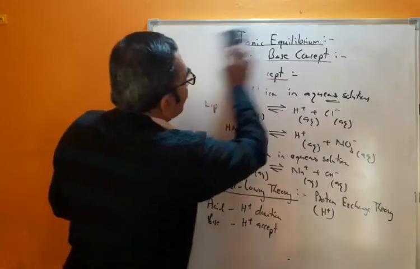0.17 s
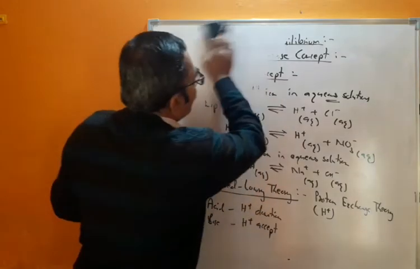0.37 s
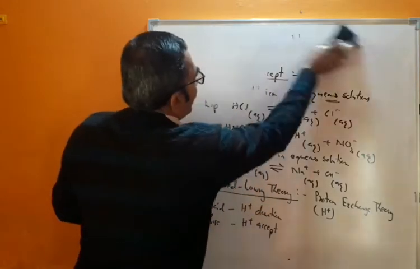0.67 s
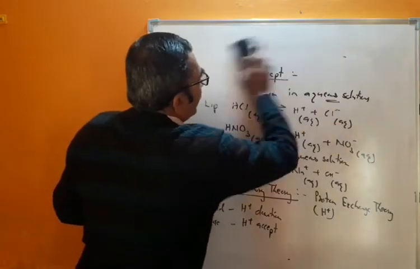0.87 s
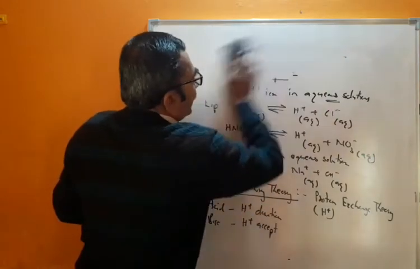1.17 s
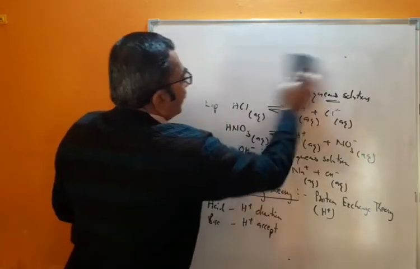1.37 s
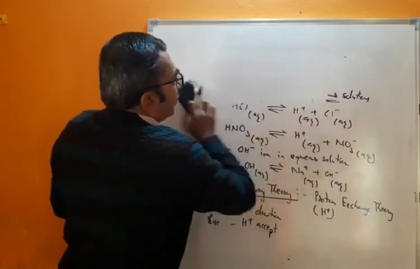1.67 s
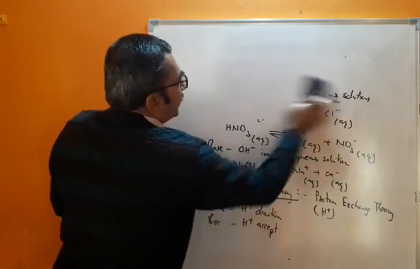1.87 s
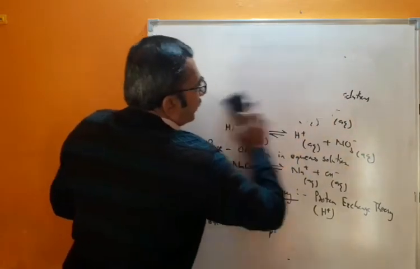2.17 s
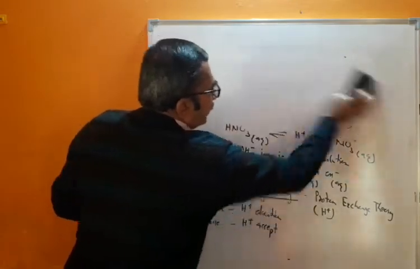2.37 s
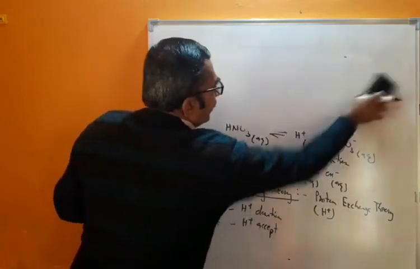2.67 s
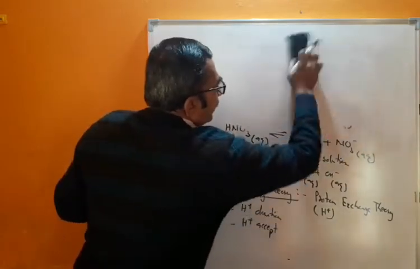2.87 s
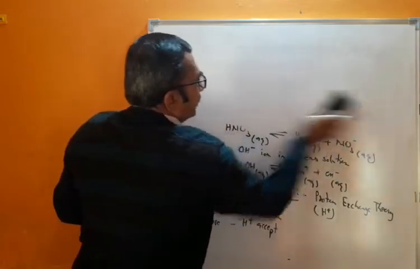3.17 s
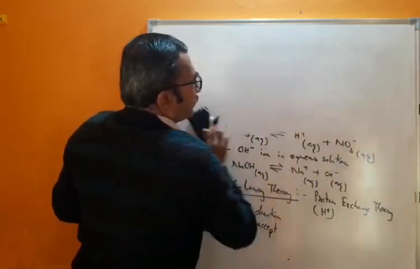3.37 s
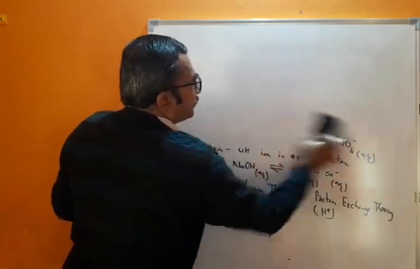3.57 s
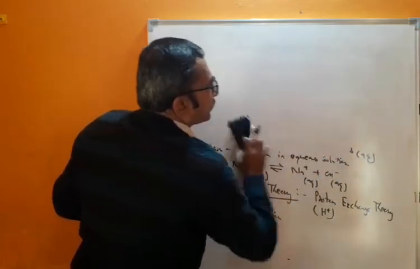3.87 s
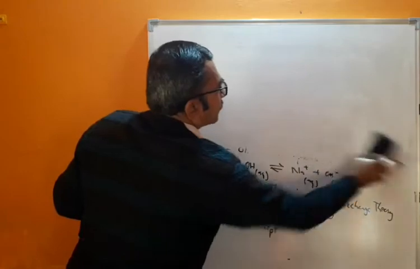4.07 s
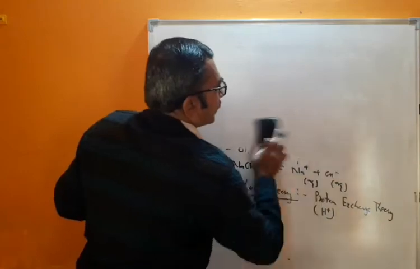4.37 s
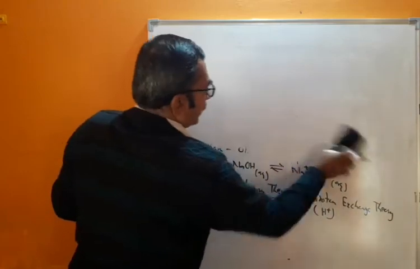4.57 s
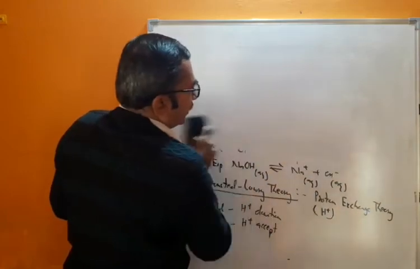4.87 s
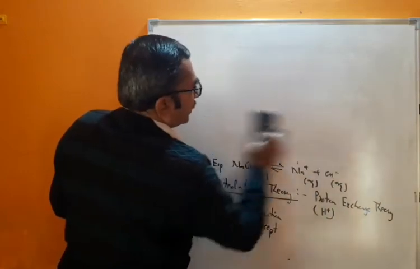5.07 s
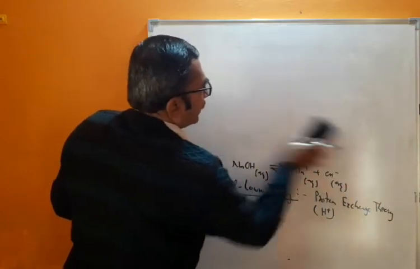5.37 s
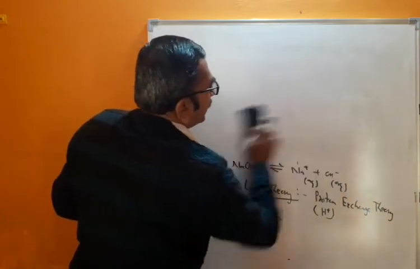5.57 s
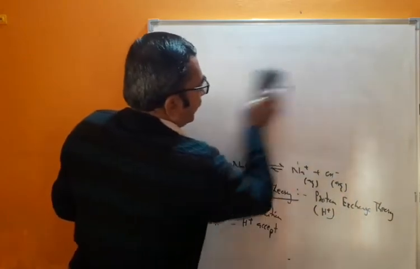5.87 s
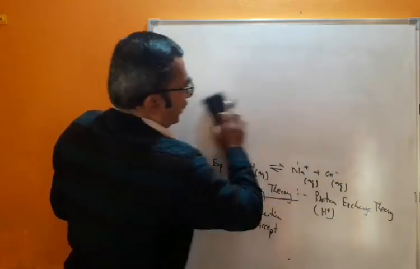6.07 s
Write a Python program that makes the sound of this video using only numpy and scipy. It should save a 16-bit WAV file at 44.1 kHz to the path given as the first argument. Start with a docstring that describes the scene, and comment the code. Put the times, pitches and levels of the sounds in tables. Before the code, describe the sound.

A felt duster rubs across a whiteboard in quick, uneven back-and-forth strokes, each a soft hiss with dull drumming from the board beneath. The pad squeaks once early on, and about halfway through the board rattles against the wall with a short room echo. Low street rumble, a hum and a faint whine come from outside, with a brief high insect chirr and, near the end, a lightly revving engine.

```python
"""Quick back-and-forth swishes: a felt duster wipes a whiteboard in a hard-walled room.
Felt fibres hiss on the slick face, swelling with each stroke, while the pad's drag drums the board.
The pad squeaks once; later the board rattles against the wall, rings and echoes in the room.
From outside come street rumble, a low hum and a faint whine, one high insect chirr
and, in the last two seconds, an engine that revs a little."""
import sys
import numpy as np
from scipy import signal
from scipy.fft import rfft, irfft, next_fast_len
from scipy.io import wavfile
from scipy.ndimage import uniform_filter1d

SR = 44100
rng = np.random.default_rng(int(sys.argv[2]) if len(sys.argv) > 2 else 0)


def inscribe(sig):
    """Save sig as 16-bit PCM at rate SR to the path in sys.argv[1].

    A 1-D sig is mono; a 2-D sig holds one channel per row.
    Samples are clipped to [-1, 1] before scaling.
    """
    pcm = np.round(np.clip(np.atleast_2d(sig).T, -1, 1) * 32767)
    wavfile.write(sys.argv[1], SR, pcm.astype(np.int16))


N = 274302

# wipes, each lasting until the next: (start [s], peak [dB], level at the opening turn [dB],
# scuff EQ [dB], upper hiss EQ [dB], top EQ [dB])
STROKES = [(0.0, -53.7, -55.5, 1.8, -0.2, 1), (0.125, -50.0, -58.5, -1.2, -1.1, -1),
           (0.289, -51, -54, 2, -1, -1), (0.439, -47, -57.5, 1.5, -0.5, -2.8),
           (0.688, -49.5, -53.9, 2.7, -0.4, 0.1), (0.873, -47.5, -54, 0.5, -0.6, -2),
           (1.058, -48, -53, 1.5, -1.5, -1), (1.272, -47, -53, -0.5, -0.5, -1.5),
           (1.497, -48.4, -54.3, 0.2, -0.0, 0.5), (1.716, -46.5, -55, 1.5, -0.8, -2),
           (1.99, -50, -54.2, 0, 0.0, 2.3), (2.175, -47.0, -55.5, -1.5, -1.5, -1),
           (2.415, -51, -54.1, 0, 0.5, 2.5), (2.554, -50, -57.5, -1.3, 1, 1.5),
           (2.744, -49.4, -53.5, 0.5, -1, -0.3), (2.918, -47.5, -56.5, -1.0, -0.3, -1.5),
           (3.143, -48, -53.5, 1.4, -1, 0.5), (3.422, -47.8, -55, 0.4, 0.4, 0),
           (3.712, -50.2, -57, -1.2, 1, 2), (3.906, -48, -56.5, -1.1, 1.8, 0.5),
           (4.2, -49.5, -57.5, -0.4, 0.5, 3), (4.44, -49.5, -56, 0.3, 1.5, -0.2),
           (4.664, -49.5, -56, -0.7, 1, 1.5), (4.959, -49, -58.5, -0.7, 1.5, 0.2),
           (5.329, -50.5, -59, 0.2, 1.5, 1), (5.547, -49, -56.5, -1, 0.4, 0.1),
           (5.797, -50.1, -56, -1, 0, 0.7), (6.086, -54.6, -58, -1, 1, 0.5)]
LAST_TURN_S, LAST_TURN_DB = 6.26, -70
# centres of the scuff, hiss, upper hiss and top EQ bands: (frequency [Hz])
EQ_HZ = [1700, 3500, 6200, 11500]
# colour of the felt's hiss: (frequency [Hz], relative level [dB])
FELT_COLOUR = [(530, -20.5), (900, -10), (1100, -5), (1490, -2.5), (2120, -3.5), (3300, -0.5), (4350, -1),
               (5580, -3.5), (7620, -8.5), (8790, -9), (10100, -7.5), (11200, -10), (13000, -12.5),
               (15600, -21.5)]
# resonances under the pad: (frequency [Hz], width [Hz], send [dB])
PAD_PEAKS = [(1715, 75, -14.5), (3307, 150, -23), (9970, 620, -10.5)]
# how far the hiss swells with a stroke: (frequency [Hz], depth [dB per dB])
SWELL_DEPTH = [(1300, 0.59), (2100, 0.75), (3000, 0.95), (4300, 1.17), (6200, 1.35), (10500, 1.58),
               (15000, 2)]
# colour of the board's drumming: (frequency [Hz], relative level [dB])
BOARD_COLOUR = [(200, -13), (330, -3.5), (500, 5), (700, 5), (950, 6), (1300, -19)]
# fader ride of the drumming: (time [s], level [dB])
DRUMMING_RIDE = [(0, -63), (.28, -59), (.4, -58.5), (.7, -61.5), (.88, -65), (1.05, -60), (1.4, -60),
                 (1.55, -66), (2.0, -70), (2.27, -64.5), (2.45, -66.5), (2.92, -68.5), (2.99, -52.5),
                 (3.15, -58.5), (3.35, -57.5), (3.7, -68.5), (4.04, -72), (4.15, -62), (4.42, -68),
                 (4.52, -61.5), (4.7, -69.5), (5.04, -70.5), (5.15, -61.5), (5.35, -66), (5.47, -59),
                 (5.8, -66), (6.22, -73)]
# board modes: (frequency [Hz], gain when knocked [dB], t60 [s])
BOARD_MODES = [(241, 1.5, 0.21), (339.6, -6.5, 0.39), (462.6, -5, 0.2), (546, -10.5, 0.45),
               (711, -12.5, 0.28), (845, -2, 0.11), (1105, -10, 0.18), (1194, -4, .1), (1268, 0, 0.18),
               (1514, -5.5, 0.07), (1760, -5, 0.039), (1966, -3, .05)]
# colour of the street rumble: (frequency [Hz], relative level [dB])
RUMBLE_COLOUR = [(15, -62), (25, -34), (69, -15), (79, -5.5), (97, -5), (113, 3.5), (130, -8.5), (151, 2),
                 (184, -5.5), (237, -2), (400, -11), (520, -16), (880, -120)]
# fader ride of the rumble: (time [s], level within 140-330 Hz [dB])
RUMBLE_RIDE = [(0, -67), (.25, -65), (.32, -59.5), (.8, -60), (.88, -65.5), (1.04, -59), (1.5, -64),
               (2.0, -62.5), (2.9, -64.5), (3.05, -59), (3.6, -65), (4.5, -60), (4.95, -63), (5.15, -55.5),
               (5.33, -61), (5.5, -55.5), (5.8, -63), (6.22, -62)]
# fader ride of the hum: (time [s], rms level [dB])
HUM_RIDE = [(0, -72), (.38, -78), (.44, -60), (.55, -85), (.62, -59), (.8, -58), (.93, -70), (1.02, -56.5),
            (1.35, -84), (1.58, -67), (1.85, -86), (2.13, -63), (2.21, -73), (2.3, -57.5), (2.9, -68),
            (3.06, -74), (3.22, -61.5), (3.45, -63.5), (4.14, -68), (4.4, -70)]
# fader ride of the whine: (time [s], rms level [dB])
WHINE_RIDE = [(0, -61), (.75, -61), (1.6, -63), (1.75, -71), (1.95, -59), (2.3, -62.5), (2.75, -63),
              (2.95, -66), (6.22, -72)]
# the pad's squeak: (time [s], pitch [Hz], rms level [dB])
SQUEAK = [(1.305, 1144, -62), (1.315, 1167, -51), (1.33, 1080, -54), (1.345, 990, -53), (1.365, 1017, -60)]
# the insect's chirr: (time [s], pitch [Hz], rms level [dB])
CHIRR = [(1.75, 11450, -82), (1.85, 11450, -69), (2.05, 11450, -70), (2.12, 11600, -60.5),
         (2.45, 11620, -60.5), (2.75, 11600, -60.5), (2.85, 11520, -62), (2.93, 11450, -78)]
# board against wall: (time [s], strength [dB], hardness [dB per octave])
KNOCKS = [(3.375, -46, 2.5), (3.385, -42.5, 2.5), (3.394, -47, -1.5), (3.409, -51.5, 6.5), (3.44, -55.5, 1)]
# engine speed: (time [s], firing rate [Hz])
ENGINE_REVS = [(4.25, 19.4), (4.66, 20.5), (5.0, 21.55), (5.25, 20.75), (5.55, 20.2), (6.22, 20.2)]
# fader rides of the engine: (time [s], fifth order rms [dB], sixth order rms [dB])
ENGINE_RIDE = [(4.25, -78, -72), (4.5, -55.5, -72), (4.7, -62.5, -70), (4.81, -60, -56.5),
               (4.97, -54.5, -63), (5.05, -61.5, -55), (5.3, -53.5, -67), (5.4, -59.5, -63),
               (5.53, -54, -59), (6.0, -57.5, -66), (6.22, -59, -54)]
# its weaker orders: (multiple of the firing rate, base level against the fifth [dB])
ENGINE_ORDERS = [(2, -22), (4, -16), (7, -10), (8, -17), (12, -15), (13, -13.5), (14, -16)]

TIME_S = np.arange(N) / SR
BIN_HZ = np.maximum(np.arange(N // 2 + 1) * SR / N, 10)


def amp(db):
    """Gain of a dB value."""
    return 10 ** (np.asarray(db) / 20)


def unit_rms(x):
    """Scaled to rms 1."""
    return x / np.sqrt(np.mean(x ** 2) + 1e-20)


def automation(rows):
    """A timed table's columns as curves, one value per sample."""
    times, *columns = np.transpose(rows)
    return [np.interp(TIME_S, times, column) for column in columns]


def gate(rows, fade_s=0.085):
    """Fades in from a table's first time and out from its last."""
    return np.clip(np.minimum(TIME_S - rows[0][0], rows[-1][0] + fade_s - TIME_S) / fade_s, 0, 1)


def at_hz(points, hz):
    """A curve read on a log frequency axis."""
    points_hz, values = np.transpose(points)
    return np.interp(np.log(hz), np.log(points_hz), values)


def drift(rate_hz):
    """A slow random wander of rms 1."""
    hop = 40
    r = np.exp(-2 * np.pi * rate_hz * hop / SR)
    slow = signal.lfilter([1], [1, -2 * r, r * r], rng.standard_normal(N // hop + 2002))[2000:]
    return np.interp(np.arange(N) / hop, np.arange(len(slow)), unit_rms(slow))


def coloured(x, colour, low_hz=20, high_hz=20000):
    """x through an EQ curve, at rms 1 between the two frequencies."""
    bins = rfft(x) * amp(at_hz(colour, BIN_HZ))
    return irfft(bins, N) / np.std(irfft(bins * (BIN_HZ > low_hz) * (BIN_HZ < high_hz), N))


def resonance(x, hz, width_hz):
    """Two-pole peak, gain 1 on top."""
    r, w = np.exp(-np.pi * width_hz / SR), 2 * np.pi * hz / SR
    return signal.lfilter([1, 0, -1], [1, -2 * r * np.cos(w), r * r], x) * (1 - r * r) / 2


def ring(clicks, hz, t60):
    """A unit click sets a sine of height 1 ringing."""
    r, w = amp(-60 / (t60 * SR)), 2 * np.pi * hz / SR
    return signal.lfilter([0, np.sin(w)], [1, -2 * r * np.cos(w), r * r], clicks + 1e-18)


def tone(hz, level_db):
    """A sine of moving pitch and given rms level."""
    phase = 2 * np.pi * np.cumsum(hz) / SR + rng.uniform(0, 2 * np.pi)
    return np.sqrt(2) * amp(level_db) * np.sin(phase)


def strokes(turn_s=0.03):
    """The pad speeds up and slows between turns: the level arches, the EQ glides stroke to stroke."""
    start, peak_db, turn_db, scuff_db, upper_db, top_db = np.transpose(STROKES)
    turns = np.append(start, LAST_TURN_S)
    progress = np.interp(TIME_S, turns, np.arange(len(turns)))
    stroke = np.minimum(progress.astype(int), len(start) - 1)
    floor_db = np.interp(TIME_S, turns, np.append(turn_db, LAST_TURN_DB))
    level_db = floor_db + (peak_db[stroke] - floor_db) * np.abs(np.sin(np.pi * progress))
    middles = (turns[1:] + turns[:-1]) / 2
    eq_db = [np.interp(TIME_S, middles, db) for db in (scuff_db, np.zeros_like(start), upper_db, top_db)]
    return uniform_filter1d(level_db, int(turn_s * SR)), eq_db   # the wrist rounds off each turn


def felt_hiss(grain_db=2.0, flicker_db=0.51, lead_s_per_octave=0.0015):
    """Countless fibre slips; the treble swells earlier and further with pad speed than the low scuff."""
    level_db, eq_db = strokes()
    mean_db = level_db.mean()
    slips = rng.standard_normal(N) * amp(grain_db * rng.standard_normal(N))
    slips += sum(amp(db) * resonance(slips, hz, width_hz) for hz, width_hz, db in PAD_PEAKS)
    spectrum = rfft(coloured(slips, FELT_COLOUR, 2500, 4800))
    centres = np.geomspace(900, 15000, 10)
    hiss = np.zeros(N)
    for centre in centres:
        band = irfft(spectrum * np.interp(np.log(BIN_HZ), np.log(centres), centres == centre), N)
        eq_weights = [np.interp(np.log(centre), np.log(EQ_HZ), solo) for solo in np.eye(len(EQ_HZ))]
        lead_s = lead_s_per_octave * np.log2(centre / EQ_HZ[1])
        swell_db = at_hz(SWELL_DEPTH, centre) * np.interp(TIME_S + lead_s, TIME_S, level_db - mean_db)
        hiss += band * amp(swell_db + np.dot(eq_weights, eq_db) + flicker_db * drift(12))
    return amp(mean_db) * hiss


def board_drumming(ringing_db=-14.5, rattle_db=-50.5):
    """The pad's drag and the rattle shake the board: dull noise, part of it held in the board's modes."""
    shake = coloured(rng.standard_normal(N), BOARD_COLOUR)
    ringing = sum((-1) ** k * resonance(shake, hz, np.log(1000) / (np.pi * t60))
                  for k, (hz, _, t60) in enumerate(BOARD_MODES))
    drag = amp(automation(DRUMMING_RIDE)[0] + 2.6 * drift(3.3))
    return np.hypot(drag, shudder(rattle_db)) * unit_rms(shake + amp(ringing_db) * unit_rms(ringing))


def street_rumble(wander_db=2.0):
    """A bed of low traffic noise that heaves unevenly."""
    gain = amp(automation(RUMBLE_RIDE)[0] + wander_db * drift(5.0))
    return gain * coloured(rng.standard_normal(N), RUMBLE_COLOUR, 140, 330)


def hum(hz=101.9, waver_hz=1.0):
    """A low, slightly wavering sine that swells and sinks."""
    return tone(hz + waver_hz * drift(3.6), automation(HUM_RIDE)[0]) * gate(HUM_RIDE)


def whine(hz=1086, width_hz=65):
    """Noise narrowed to a faint pitch by two resonances in series."""
    narrow = resonance(rng.standard_normal(N), hz, width_hz)
    return amp(automation(WHINE_RIDE)[0]) * unit_rms(resonance(narrow, hz, 2 * width_hz))


def pad_squeak():
    """The pad squeaks once: a short sine that bends downward."""
    return tone(*automation(SQUEAK)) * gate(SQUEAK, fade_s=0.0074)


def insect(half_width_hz=77):
    """A high chirr: a narrow band of noise riding on a slowly moving pitch."""
    hz, level_db = automation(CHIRR)
    lowpass = signal.butter(3, half_width_hz, fs=SR, output="sos")
    flutter = signal.sosfilt(lowpass, rng.standard_normal((2, N)))
    phase = 2 * np.pi * np.cumsum(hz) / SR
    return amp(level_db) * unit_rms(flutter[0] * np.cos(phase) + flutter[1] * np.sin(phase))


def wall_rattle():
    """Each knock of board on wall strikes the board's modes; a harder knock favours the upper ones."""
    times, strength_db, hardness = np.transpose(KNOCKS)
    onsets = np.round(times * SR).astype(int)
    rattle = np.zeros(N)
    for k, (hz, mode_db, t60) in enumerate(BOARD_MODES):
        clicks = np.zeros(N)
        clicks[onsets] = amp(strength_db + mode_db + hardness * np.log2(hz / 600))
        rattle += (-1) ** k * ring(clicks, hz, t60)   # neighbours swing opposite ways, thinning the bass
    return rattle


def shudder(level_db, attack_s=0.011, t60=0.56):
    """Envelope of the shaken board: it jumps up with the first knock and dies away."""
    age_s = TIME_S - KNOCKS[0][0]
    return amp(level_db - 60 * np.abs(age_s) / t60) * np.clip(age_s / attack_s, 0, 1)


def board_thud(level_db=-47.5, band_hz=(150, 380)):
    """The weight under the rattle: a burst of low noise."""
    bandpass = signal.butter(3, band_hz, "band", fs=SR, output="sos")
    return shudder(level_db) * unit_rms(signal.sosfilt(bandpass, rng.standard_normal(N)))


def room_echo(x, t60=0.55, damping_hz=5000):
    """Sound bounces between hard walls: twelve feedback delays, duller on every round."""
    size = next_fast_len(N + SR)
    hz = np.arange(size // 2 + 1) * SR / size
    decay_s = t60 * (0.4 + 0.6 / (1 + (hz / damping_hz) ** 2))
    response = 0
    for k, delay_s in enumerate(rng.uniform(0.015, 0.045, 12)):
        bounce = amp(-60 * delay_s / decay_s) * np.exp(-2j * np.pi * hz * delay_s)
        response += (-1) ** k * bounce / (1 - bounce)
    return irfft(rfft(x, size) * response, size)[:N]


def engine(waver_db=1.6, nearing_db_per_s=4):
    """Orders of the firing rate: the weak ones waver, those below the fifth grow as the engine nears."""
    firing_hz = automation(ENGINE_REVS)[0]
    fifth_db, sixth_db = automation(ENGINE_RIDE)
    nearing_db = nearing_db_per_s * (TIME_S - np.mean(np.transpose(ENGINE_RIDE)[0]))
    weak = sum(tone(order * firing_hz, fifth_db + db + nearing_db * (order < 5) + waver_db * drift(3.7))
               for order, db in ENGINE_ORDERS)
    return (tone(5 * firing_hz, fifth_db) + tone(6 * firing_hz, sixth_db) + weak) * gate(ENGINE_RIDE)


def scene():
    """The board over the outdoor bed, mono on both channels; only the rattle feeds the echo."""
    rattle = wall_rattle()
    board = pad_squeak() + felt_hiss() + board_drumming() + rattle + board_thud()
    echo = amp(-18) * room_echo(rattle)
    outside = street_rumble() + hum() + whine() + engine() + insect()
    mono = board + echo + outside
    return np.array([mono, mono])


def record(dry):
    """A steep low-pass takes off the air above 15.8 kHz."""
    return signal.sosfilt(signal.ellip(16, 0.5, 80, 15800, fs=SR, output="sos"), dry)


dry = scene()
out = record(dry)
inscribe(out)
```